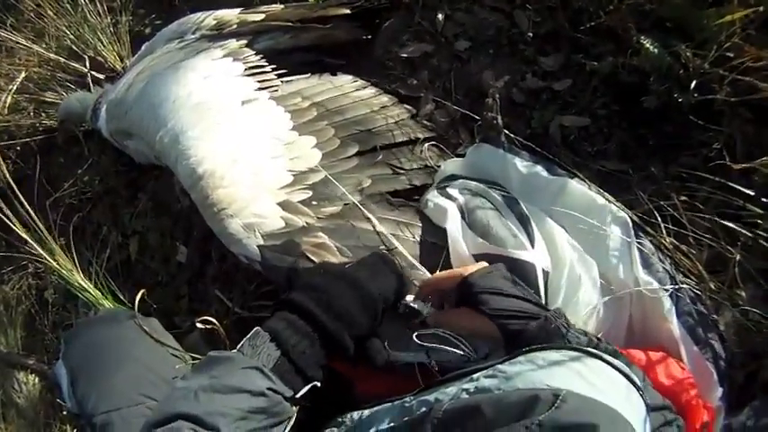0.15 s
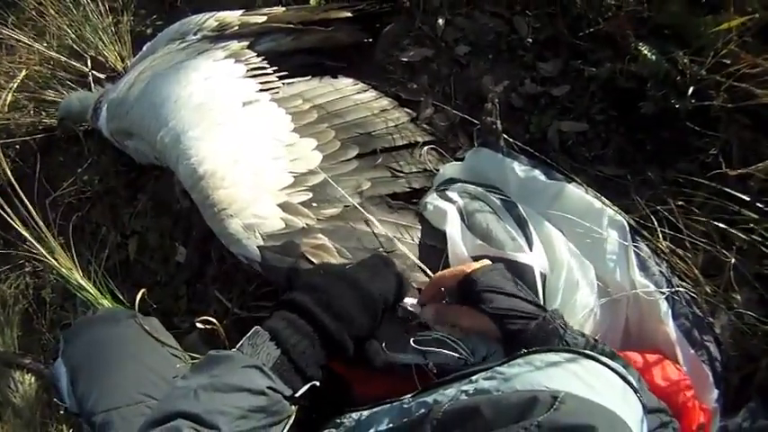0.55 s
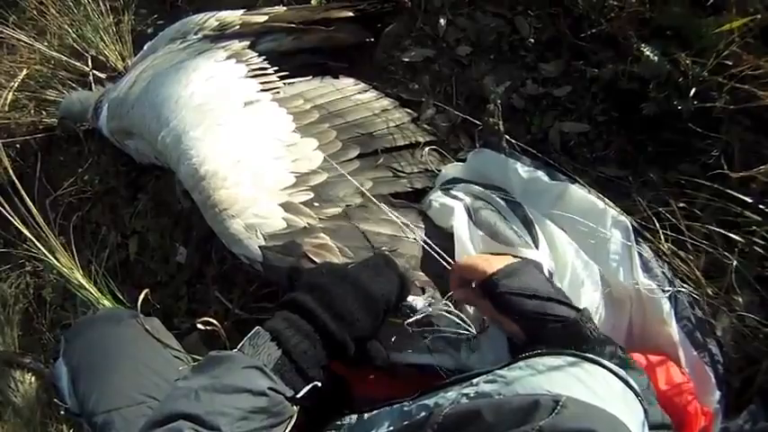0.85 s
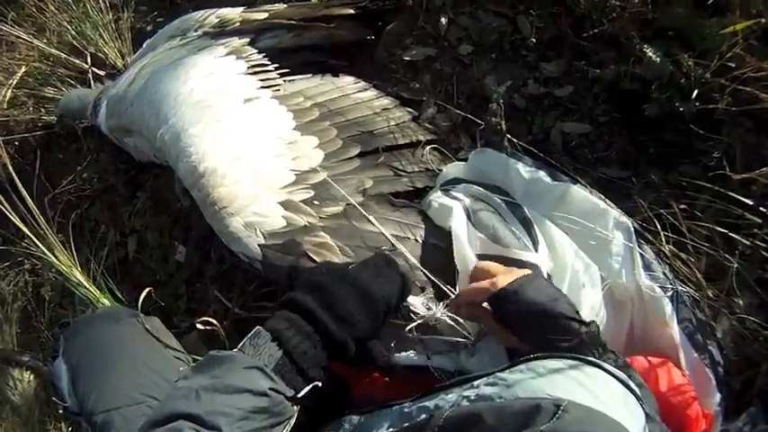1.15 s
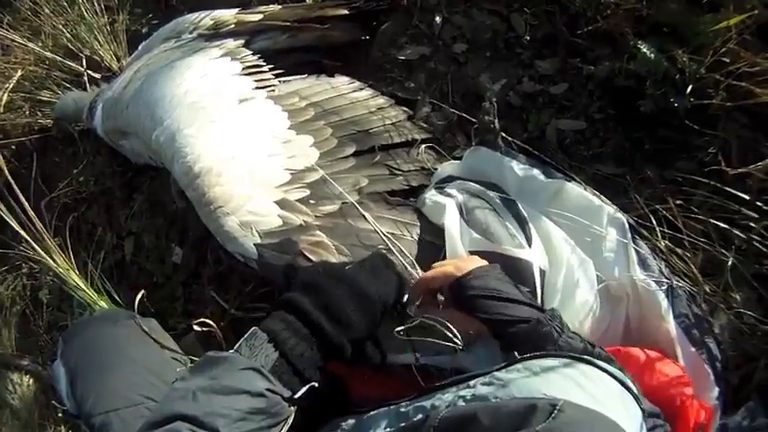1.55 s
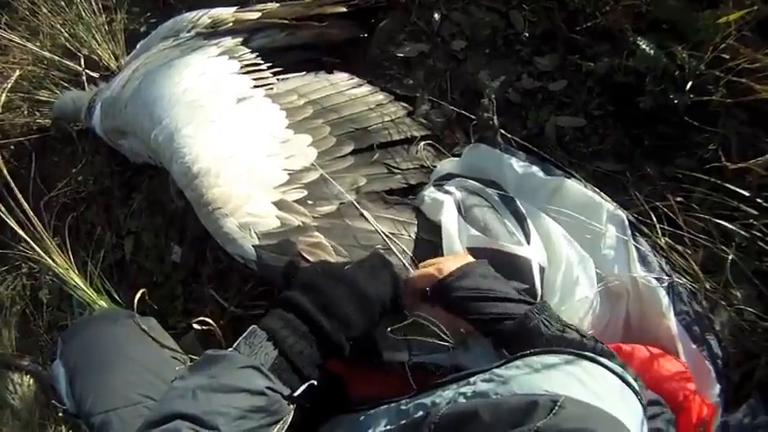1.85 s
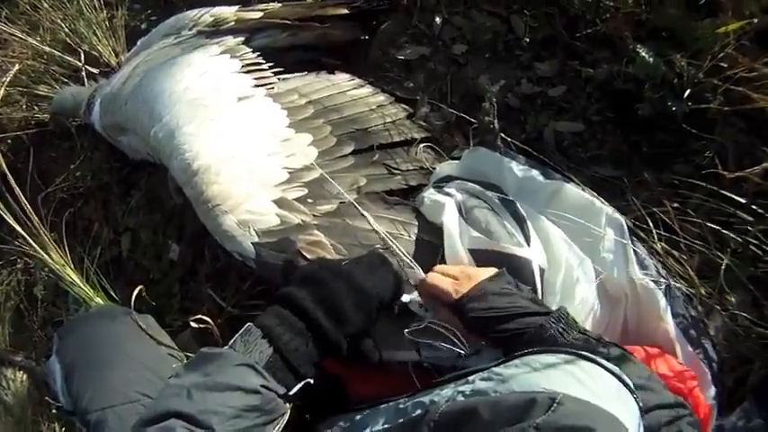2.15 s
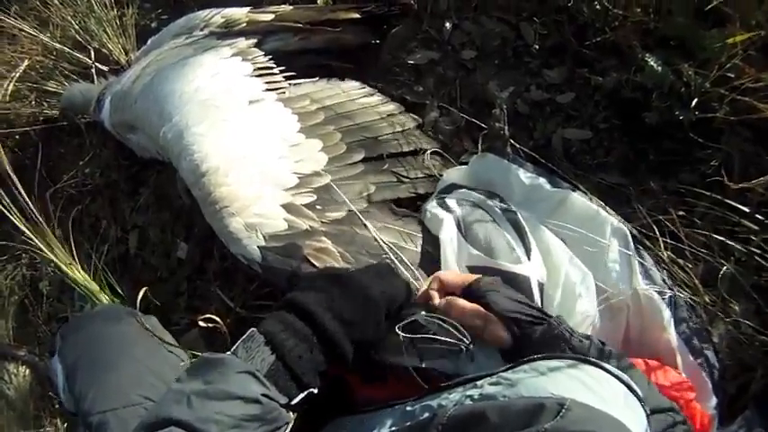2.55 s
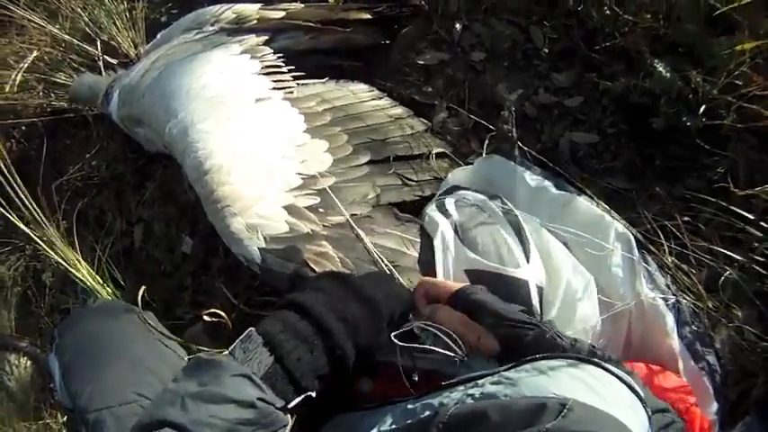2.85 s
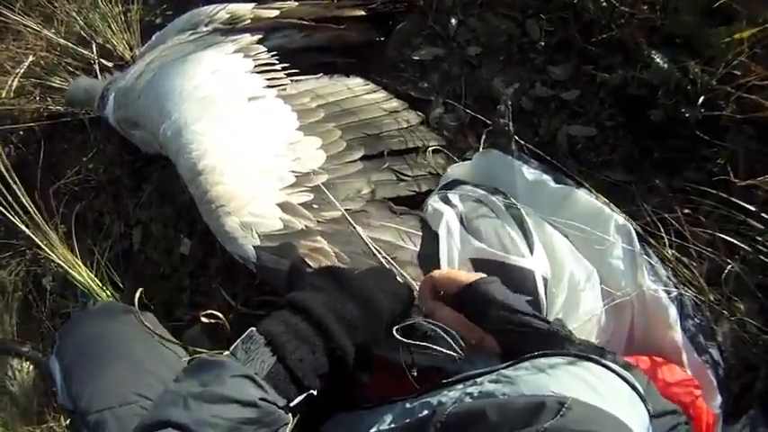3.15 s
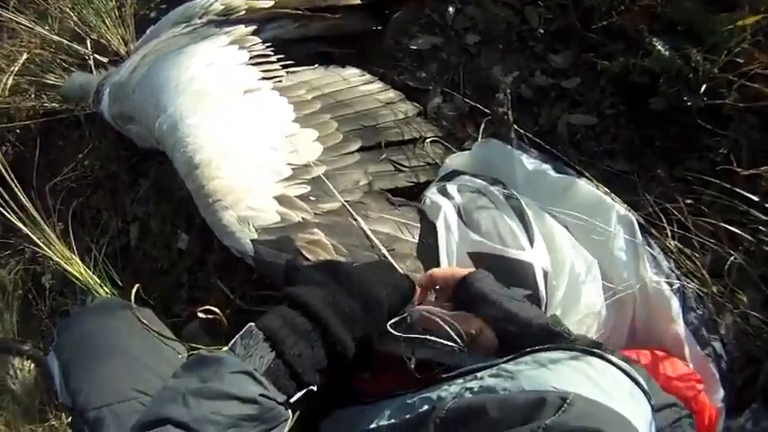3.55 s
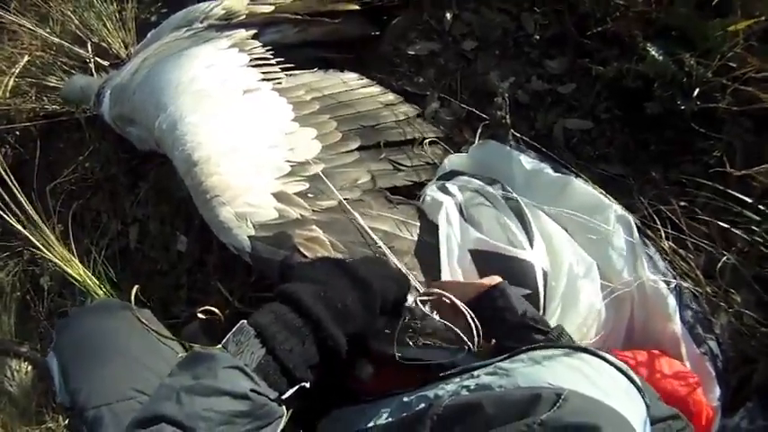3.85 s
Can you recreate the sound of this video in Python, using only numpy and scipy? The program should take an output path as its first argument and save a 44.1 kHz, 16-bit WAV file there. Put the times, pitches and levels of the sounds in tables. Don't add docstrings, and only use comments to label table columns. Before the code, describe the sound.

Crickets trill over a distant shimmering chorus; a close one joins at half a second. Beside the microphone, hands rustle cloth in swells, with ticks and dull bumps, outdoors, in gritty low-grade sound.

```python
import sys
import numpy as np
from scipy import signal
from scipy.io import wavfile

SR = 44100
rng = np.random.default_rng(int(sys.argv[2]) if len(sys.argv) > 2 else 0)


def volts(x):
    e = np.asarray(x, float) / 20
    return 10 ** e


def log_audio(samples):
    frames = np.atleast_2d(samples).T
    limited = np.clip(frames, -1, 1)
    pcm = np.round(limited * 32767).astype(np.int16)
    wavfile.write(sys.argv[1], SR, pcm)


N = 176400


def rms_one(x):
    return x / np.sqrt(np.mean(x ** 2) + 1e-20)


def in_time(rows):
    return np.interp(np.arange(N) / SR, *np.transpose(rows))


def drift(rate):
    r = np.exp(-80 * np.pi * rate / SR)
    white = rng.standard_normal(N // 40 + 2002)
    slow = signal.lfilter([1], [1, -2 * r, r * r], white)[2000:]
    return np.interp(np.arange(N) / 40, np.arange(len(slow)), rms_one(slow))


def resonate(x, hz, width):
    r = np.exp(-np.pi * width / SR)
    poles = [1, -2 * r * np.cos(2 * np.pi * hz / SR), r * r]
    return signal.lfilter([(1 - r * r) / 2, 0, (r * r - 1) / 2], poles, x + 1e-18)


def narrow_noise(hz, width):
    return rms_one(resonate(resonate(rng.standard_normal(N), hz, width), hz, width))


def banded(white, spectrum, patchy_db):
    out, together = 0, drift(9)
    edges = 20 * 2 ** np.arange(0, 8.3, .5)
    hz, db = np.transpose(spectrum)
    for k, (low, high) in enumerate(zip(edges, edges[1:])):
        band_pass = signal.butter(2, [low, high], "band", fs=SR, output="sos")
        band = signal.sosfilt(band_pass, white[k % 2])
        level_db = np.interp(np.log(low * high) / 2, np.log(hz), db)
        flicker_db = patchy_db * (together + 0.84 * drift(9.3))
        out = out + band * volts(level_db + flicker_db)
    return rms_one(out)


def hums(rows, depth):
    strokes_per_s = 36
    out, t = 0, np.arange(N) / SR
    for s, length, hz, width, db in rows:
        swell = np.abs(np.sin(np.pi * np.clip((t - s) / length, 0, 1))) ** 0.1 * (t < s + length)
        throb = 1 + depth * np.sin(2 * np.pi * strokes_per_s * (t - s))
        out = out + volts(db) * swell * throb * narrow_noise(hz, width)
    return out


def knocks(rows, t60, snap):
    out, lag = np.zeros(N + SR), np.arange(int(.1 * SR)) / SR
    for s, db, hz in rows:
        ring = np.sin(2 * np.pi * hz * lag) * volts(-60 * lag / t60)
        dry_snap = snap * rng.standard_normal(len(lag)) * volts(-120 * lag / t60)
        start = int(s * SR)
        out[start:start + len(lag)] += volts(db) * (ring + dry_snap)
    return out[:N]


def among_trees(x, echo_db):
    t60_s = .08
    lag = np.arange(int(.15 * SR)) / SR
    echo = rng.standard_normal(len(lag)) * volts(-60 * lag / t60_s) * (lag > .003)
    return x + volts(echo_db) * signal.fftconvolve(x, echo / np.linalg.norm(echo))[:N]


def singer(times, levels_db, wing_hz, echo_db):
    teeth, teeth_per_s, slowing_per_s2 = 15, 540, 10500
    rise_s, fall_s, hold_s = .0052, .003, .007
    ring_s, wing_rise_hz_per_s = .00105, 36000
    chirp_jitter_s, tooth_jitter_s, chirp_spread_db, tooth_spread_db = 4e-4, 1e-5, .6, 1.5
    out, lag = np.zeros(N + SR), np.arange(int(.007 * SR)) / SR
    k = np.arange(teeth) - teeth * .6
    u = (teeth_per_s - np.sqrt(teeth_per_s ** 2 - 2 * slowing_per_s2 * k)) / slowing_per_s2
    before = np.minimum(u + hold_s / 2, 0) / rise_s
    after = np.maximum(u - hold_s / 2, 0) / fall_s
    stroke = np.exp(-before ** 2 - after ** 2)
    hz = wing_hz + wing_rise_hz_per_s * u
    for s, db, chance in zip(times, levels_db, rng.standard_normal((len(times), 3, teeth))):
        middle = .4988 + s + chirp_jitter_s * chance[2, 0]
        at = middle + u * (1 + .004 * chance[2, 2]) + tooth_jitter_s * chance[0]
        since = np.maximum(lag - (at * SR % 1)[:, None] / SR, 0)
        swell = (since / ring_s * np.exp(1 - since / ring_s)) ** 2
        rings = swell * np.sin(2 * np.pi * hz[:, None] * since)
        gains = stroke * volts(db + 4.5 + tooth_spread_db * chance[1] + chirp_spread_db * chance[2, 1])
        np.add.at(out, (at * SR).astype(int)[:, None] + np.arange(len(lag)), gains[:, None] * rings)
    return among_trees(out[SR // 2:SR // 2 + N], echo_db)


def forest_air():
    # hz, level_db (per Hz)
    air_spectrum = [(12, -30), (20, 2.5), (118, 4), (284, -10), (455, -4.5), (486, -65), (815, -11),
                    (2560, -34.5), (4300, -33), (5590, -51), (9460, -120)]
    level_db = -49.5
    return volts(level_db - 3.0) * banded(rng.standard_normal((2, N)), air_spectrum, patchy_db=1.53)


def chorus():
    # time_s, level_db
    crowd_level = [(0.0, -40), (0.48, -42.5), (1.41, -40.5), (1.59, -45), (1.76, -42), (2.16, -45),
                   (3.04, -45), (3.25, -41.5), (4.0, -36)]
    # pitch_hz, width_hz, level_db
    wings = [(4794, 580, -11), (5092, 340, -9.5), (5220, 130, -22), (6135, 1200, -3)]
    out = 0
    for hz, width, db in wings:
        out = out + volts(db + 0.63 * drift(40)) * narrow_noise(hz, width)
    return volts(in_time(crowd_level) - 2.5) * rms_one(out)


def distant_trills():
    # start_s, length_s, pitch_hz, width_hz, level_db
    trills = [
        (-.2, .6, 4790, 70, -51),
        (.5, 1.2, 5287, 35, -54),
        (.6, 1.15, 4505, 25, -60),
        (.6, 1.0, 5665, 30, -63),
        (1.75, 1.05, 5112, 60, -57),
        (2.05, .76, 4790, 70, -57),
        (2.78, .85, 5290, 60, -59),
        (3.1, .5, 5482, 50, -57),
    ]
    return hums(trills, 0.74)


def far_crickets():
    # first_chirp_s, chirps, period_s, level_db, wing_hz
    songs = [
        (.003, 17, 0.041, -48, 5050),
        (.02, 63, .0318, -52, 5420),
        (1.799, 26, 0.039, -55.5, 5040),
        (2.822, 25, .0308, -50.5, 5370),
        (3.1, 17, 0.037, -48, 5010),
    ]
    out = 0
    for s, count, period, db, hz in songs:
        n = np.arange(count)
        swell_db = -4.9 * np.exp(-n / 3.7) * (s > 1)
        out = out + singer(s + period * n, db + swell_db, hz, echo_db=4)
    return out


def rustle():
    # time_s, level_db
    handling = [(0, -50.5), (.1, -56.5), (.24, -51.5), (.42, -57), (.93, -60), (1.1, -52.5), (1.3, -50),
                (1.45, -56), (1.72, -49.5), (1.82, -55), (2.35, -52.5), (2.53, -50.5), (2.65, -57),
                (2.88, -48.5), (3.22, -51), (3.3, -52), (3.65, -56), (4, -59.5)]
    # hz, level_db (per Hz)
    cloth_spectrum = [(88, -61), (150, -5.5), (256, 0), (401, -2), (502, -0.5), (880, -10.5), (3070, -10.5),
                      (4120, -20), (4300, -26.5), (5590, -46), (9460, -120)]
    grains_per_s, grain_db, level_db, follows = 500, -13, 5.5, 1.03
    effort = in_time(handling)
    struck = rng.random(N) < grains_per_s / SR
    grains = struck * volts(10.6 * np.minimum(rng.exponential(1, N), 4)) * rng.choice([-1, 1], N)
    white = rng.standard_normal((2, N)) + volts(grain_db) * rms_one(grains)
    swell_db = effort.mean() + level_db + follows * (effort - effort.mean())
    return volts(swell_db) * banded(white, cloth_spectrum, patchy_db=1.02)


def cloth_bumps():
    # start_s, peak_db, pitch_hz
    bumps = [
        (0.249, -37, 80.7),
        (1.238, -35.5, 248),
        (2.081, -37, 239),
        (2.499, -45, 510),
        (3.209, -32, 320),
        (3.401, -31, 82),
        (3.839, -32, 112.2),
    ]
    return knocks(bumps, .026, 0)


def cord_ticks():
    # start_s, peak_db, pitch_hz
    ticks = [(0.1256, -44, 1970), (0.3765, -44, 1940), (1.2316, -34, 3210), (1.3823, -33, 2570),
             (1.4576, -42, 3010), (1.502, -42, 3270), (1.937, -40, 2950), (2.1385, -34, 3140),
             (2.7033, -39, 1780), (2.9108, -37, 3000), (3.0405, -34, 2490), (3.1472, -34, 2270),
             (3.2261, -35, 2640), (3.5633, -43, 3000), (3.8756, -40, 3120), (3.9374, -45, 1830)]
    return volts(1.5) * knocks(ticks, .007, volts(-6))


def cord_rubs():
    # start_s, length_s, pitch_hz, width_hz, level_db
    rubs = [
        (.08, .36, 1960, 60, -57),
        (1.08, .28, 3100, 500, -57),
        (2.8, .3, 2100, 700, -59),
        (2.3, .27, 520, 250, -54),
    ]
    return hums(rubs, 0)


def near_cricket():
    # first_chirp_s, chirps, level_db, start_drop_db (below the level)
    songs = [
        (.512, 38, -36.5, 7),
        (3.645, 11, -35.5, 8.5),
    ]
    period_s, hurry_s, swell_chirps = .0352, 4.9e-5, 3.7
    strokes = []
    for s, count, db, low in songs:
        for n in range(int(count)):
            time_s = s + period_s * n - hurry_s * n * n
            level_db = db - low * np.exp(-n / swell_chirps) - 1.6 * (n == 37)
            strokes.append((time_s, level_db))
    times, levels_db = np.transpose(strokes)
    return singer(times, levels_db, wing_hz=4960, echo_db=-15)


def scene():
    forest = forest_air() + chorus() + distant_trills() + far_crickets()
    hands = rustle() + cloth_bumps() + cord_ticks() + cord_rubs()
    return (forest + hands + near_cricket())[None]


def roll_off(x):
    return signal.sosfilt(signal.butter(12, 15470, fs=SR, output="sos"), x)


def record(dry):
    hold_hz, cutoff_hz = 12000, 15450
    low = signal.resample_poly(dry, hold_hz // 300, SR // 300, axis=1, window=("kaiser", 3))
    steps = np.repeat(low, 4, axis=1)
    held = signal.resample_poly(steps, SR // 300, hold_hz * 4 // 300, axis=1)[:, :N]
    low_pass = signal.ellip(10, .3, 60, cutoff_hz - 150, fs=SR, output="sos")
    return roll_off(signal.sosfilt(low_pass, held))


dry = scene()
out = record(dry)
log_audio(out)
```